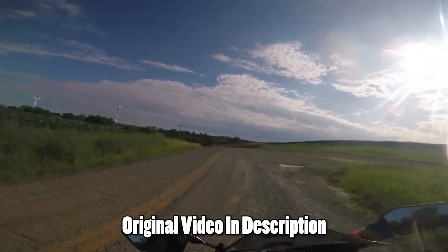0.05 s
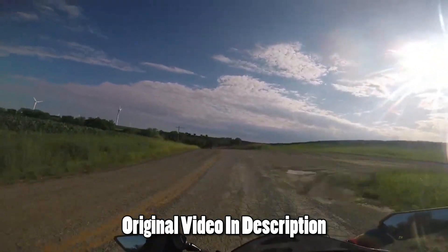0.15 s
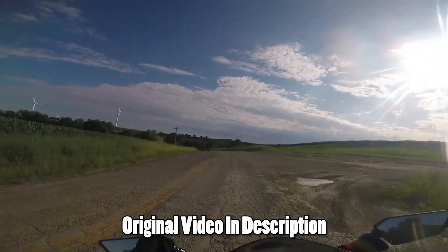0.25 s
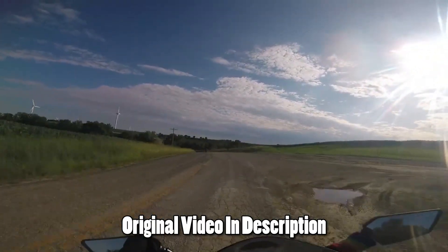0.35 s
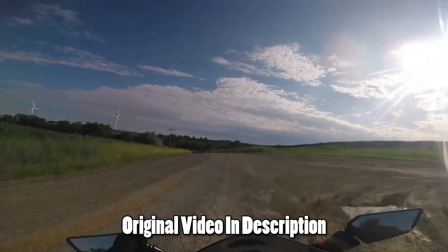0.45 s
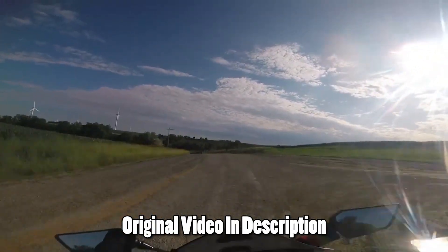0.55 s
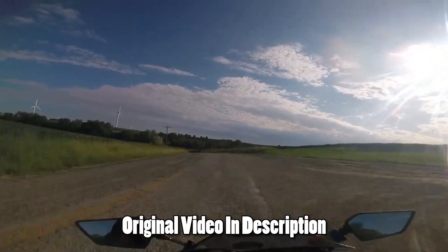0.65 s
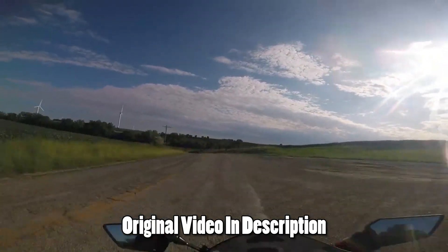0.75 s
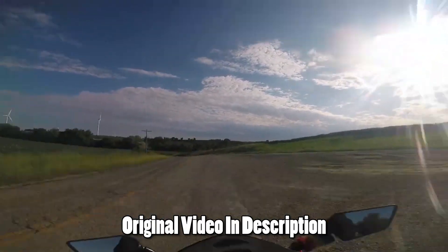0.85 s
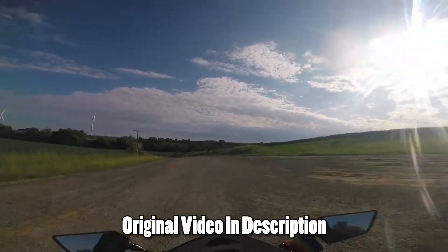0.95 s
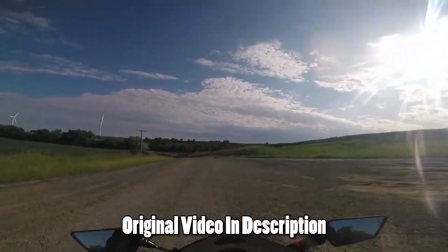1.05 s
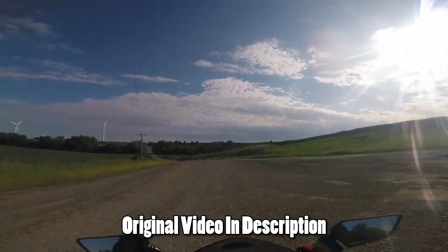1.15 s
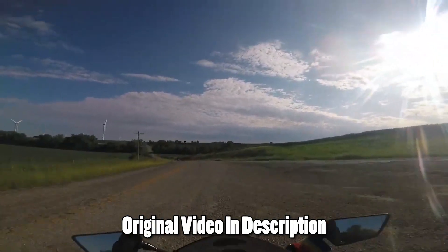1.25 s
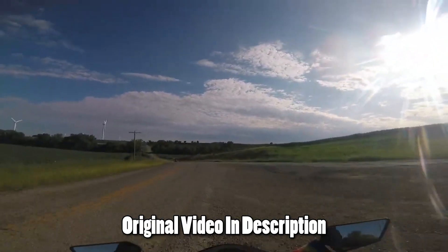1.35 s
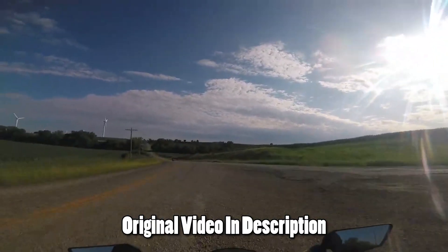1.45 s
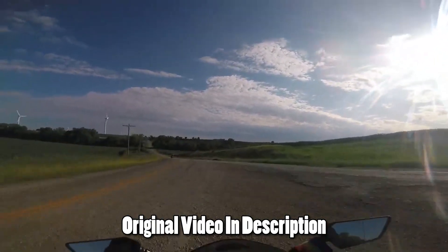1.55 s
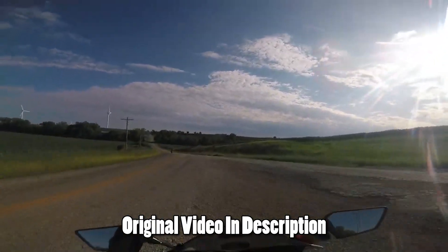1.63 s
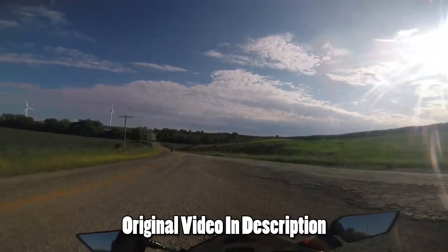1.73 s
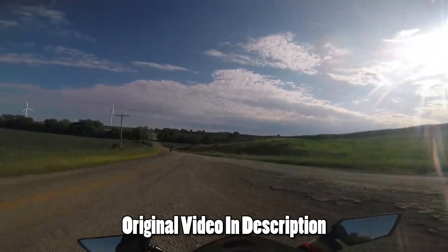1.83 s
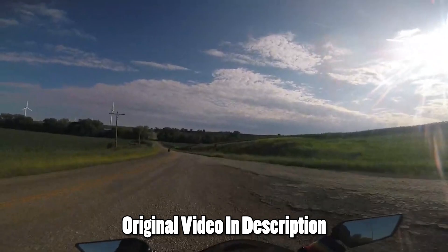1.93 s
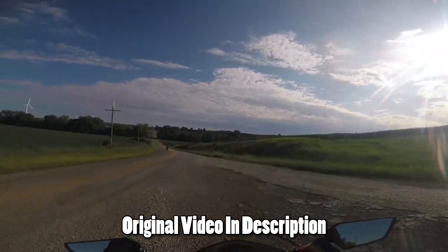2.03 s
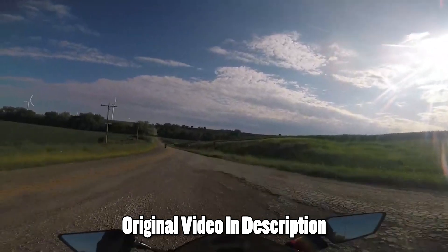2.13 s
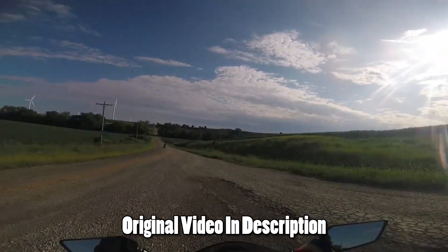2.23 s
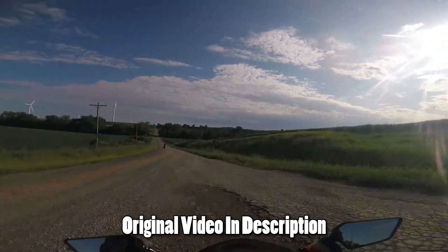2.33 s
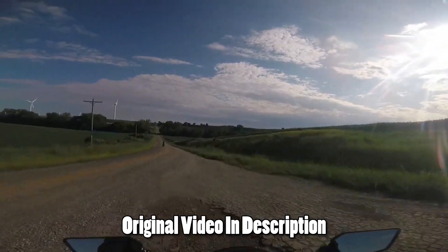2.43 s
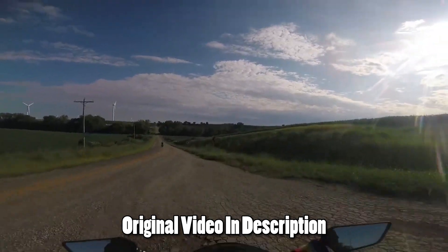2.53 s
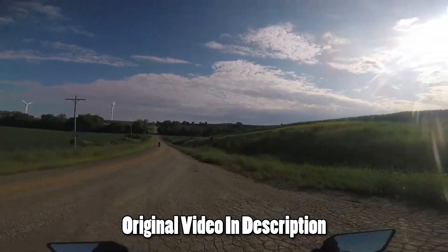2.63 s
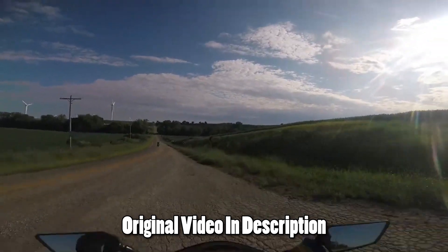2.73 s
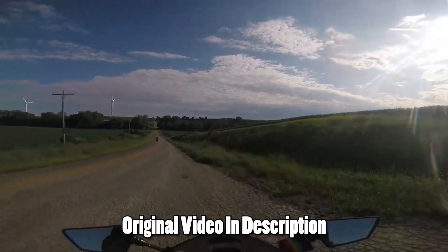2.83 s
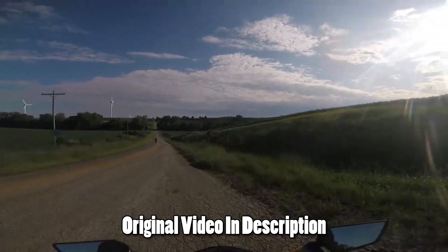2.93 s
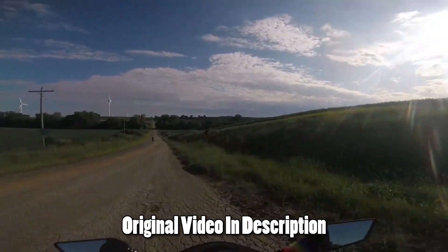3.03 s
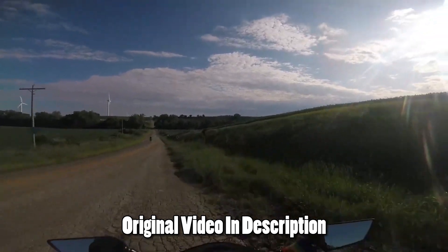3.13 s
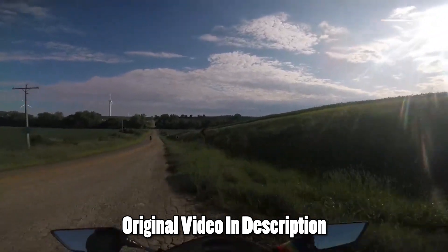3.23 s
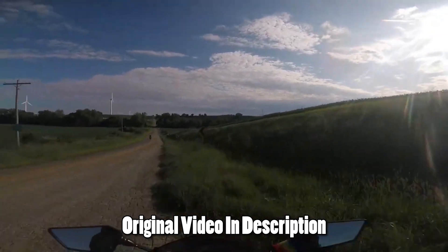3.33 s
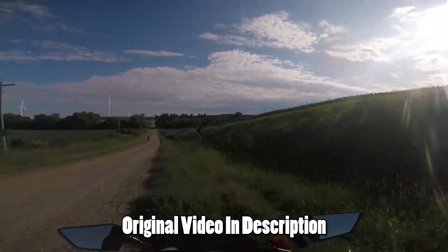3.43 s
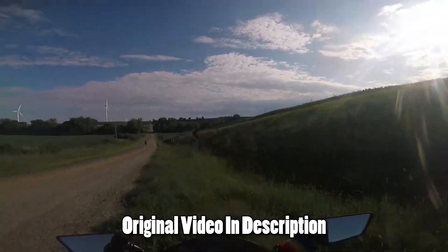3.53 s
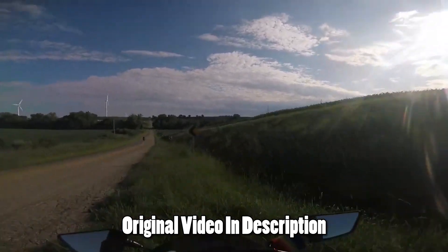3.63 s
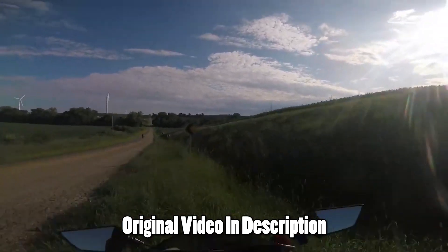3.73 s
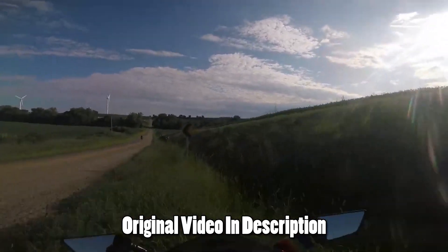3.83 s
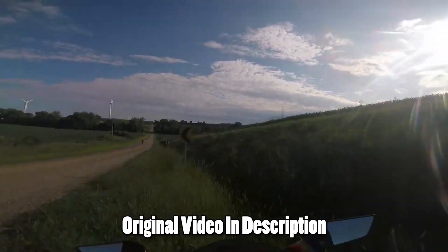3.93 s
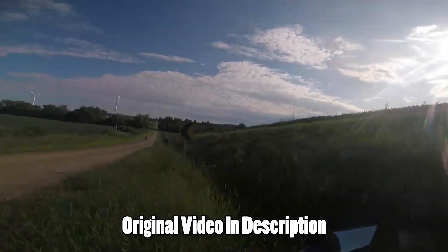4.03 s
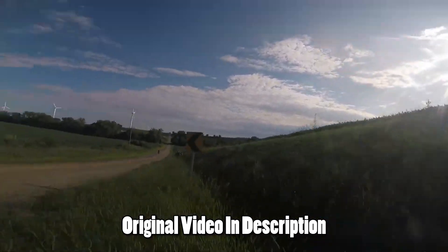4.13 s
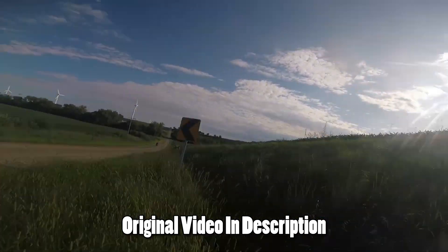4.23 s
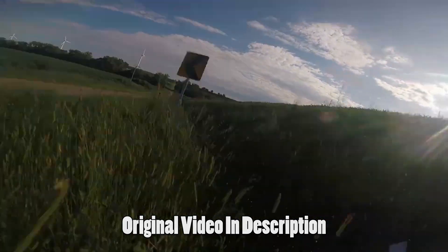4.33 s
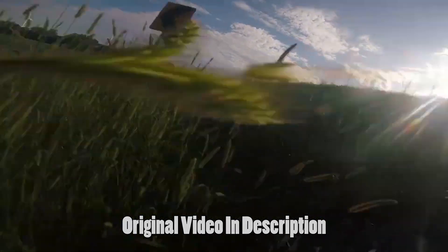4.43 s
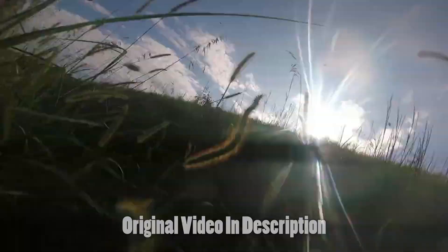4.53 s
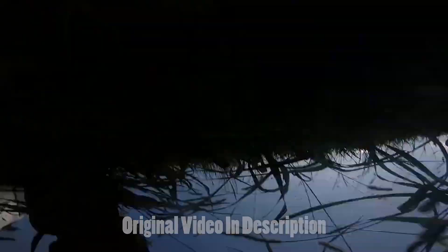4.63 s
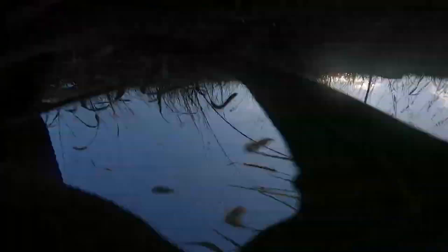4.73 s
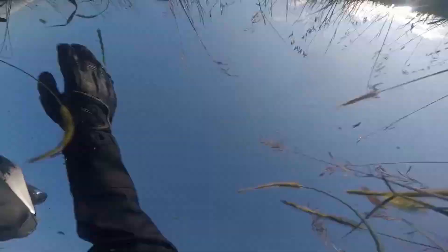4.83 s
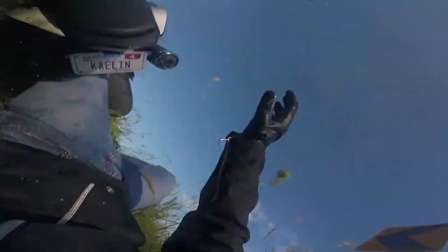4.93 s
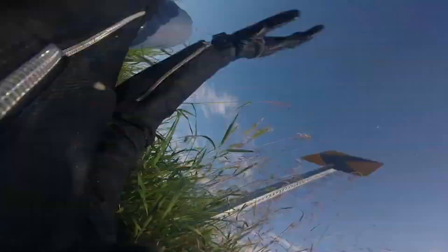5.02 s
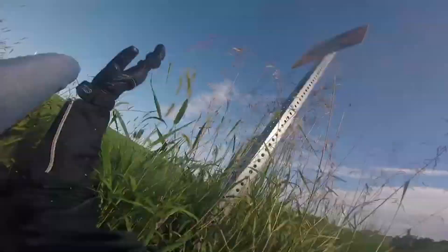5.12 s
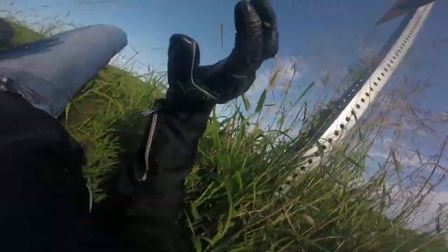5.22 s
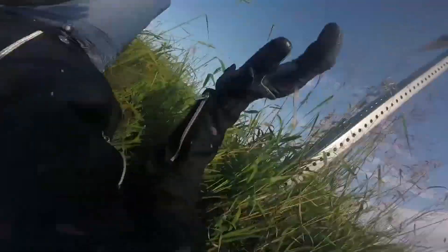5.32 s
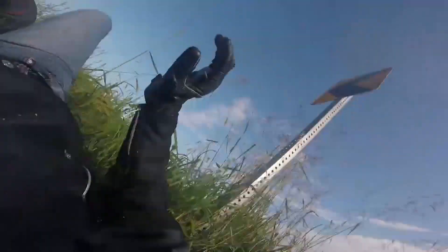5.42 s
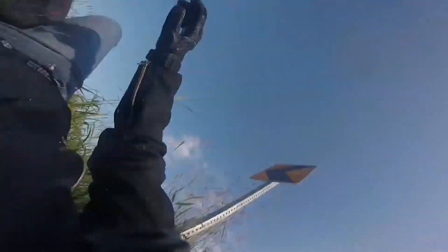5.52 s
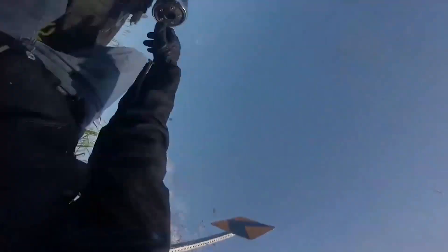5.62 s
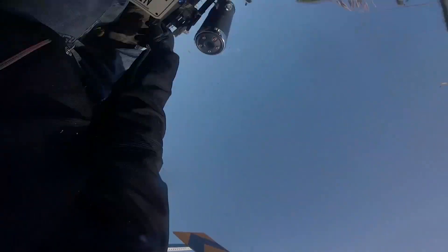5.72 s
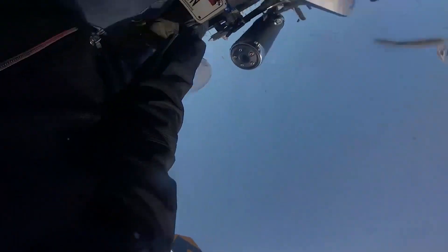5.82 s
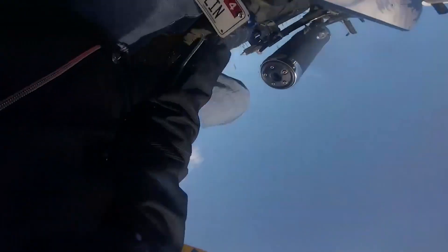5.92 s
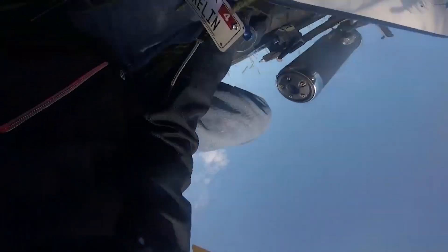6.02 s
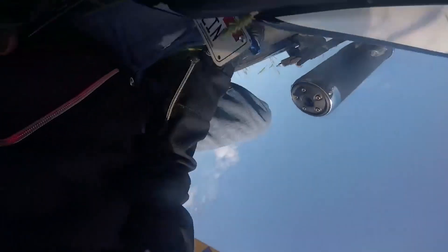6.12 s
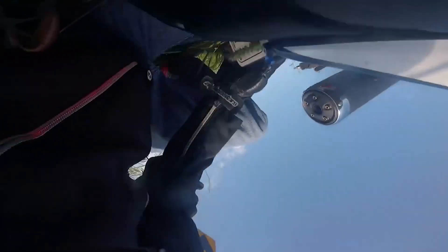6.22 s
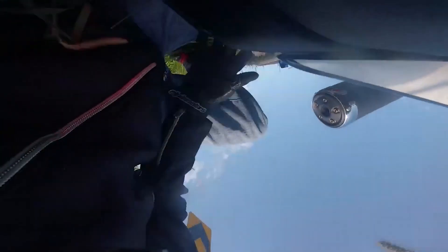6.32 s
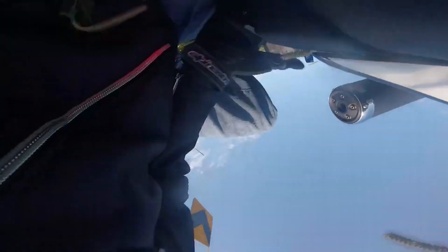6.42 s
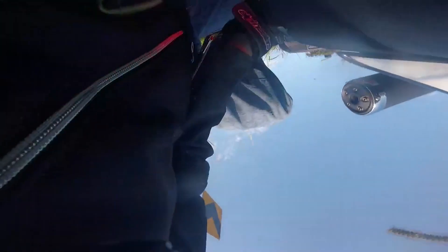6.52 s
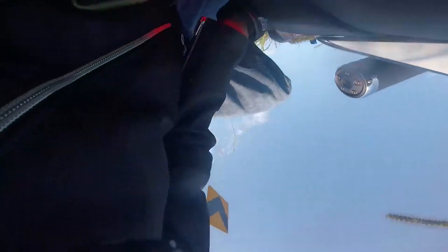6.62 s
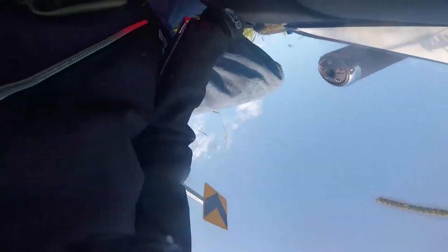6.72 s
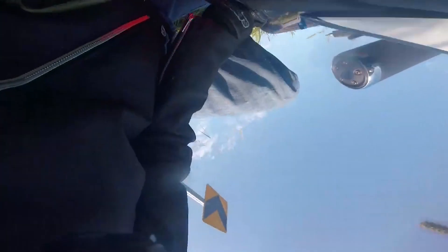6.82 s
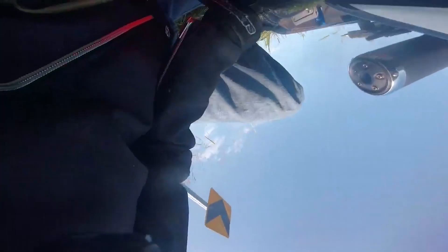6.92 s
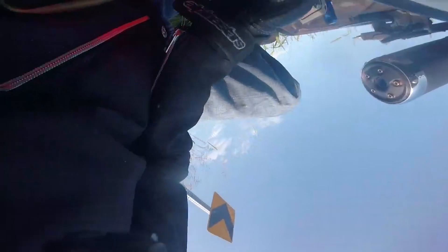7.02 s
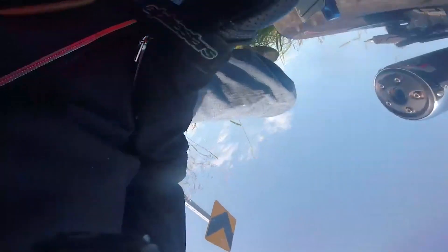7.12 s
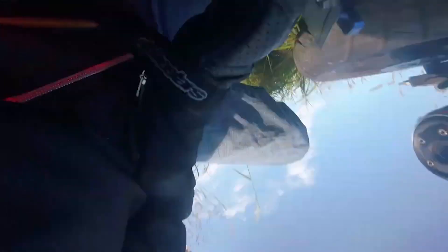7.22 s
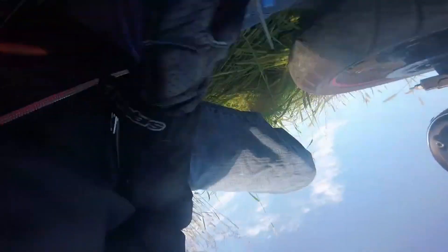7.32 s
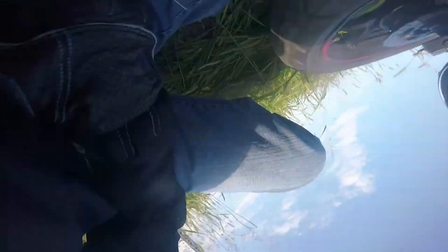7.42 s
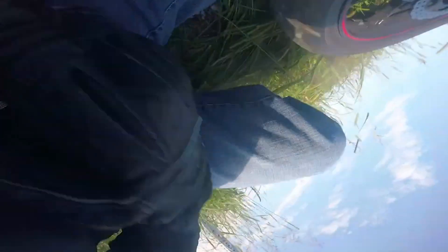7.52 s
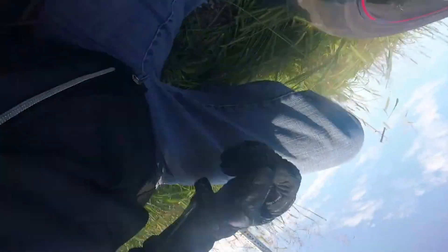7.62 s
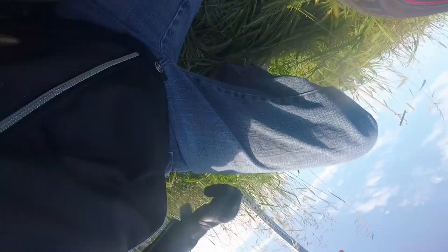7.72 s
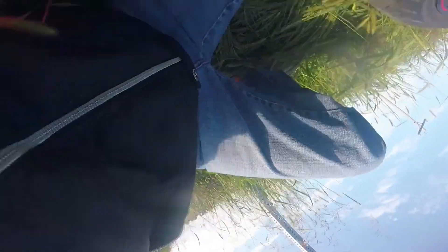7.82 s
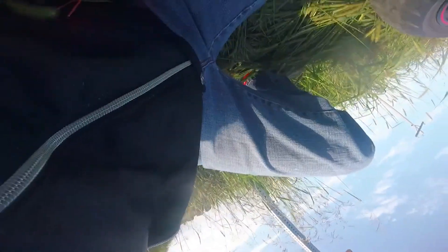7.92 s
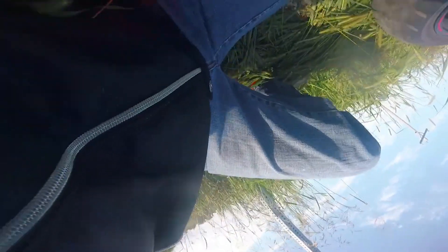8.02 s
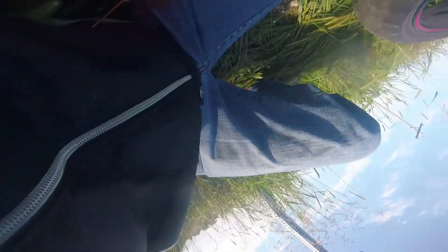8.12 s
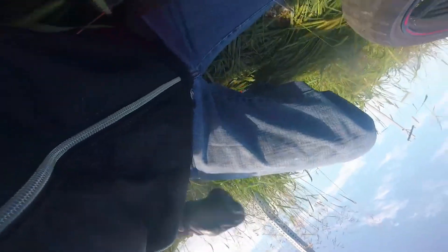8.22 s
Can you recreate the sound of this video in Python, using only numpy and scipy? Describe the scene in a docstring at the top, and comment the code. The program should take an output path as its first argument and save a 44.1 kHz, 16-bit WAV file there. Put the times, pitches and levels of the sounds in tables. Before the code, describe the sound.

Heard from a helmet microphone in a closed case, wind rumbles and rushes as a motorcycle rolls over gravel, with grit ticking and loose parts ringing faintly. The engine drops to idle, then bike and rider tumble into tall grass in a clatter of hollow knocks. The wind stops. The fallen engine chugs softly in spells, cloth and grass rustle, and one more cluster of loud knocks comes near the end.

```python
"""A motorcycle tumble in tall grass

A helmet camera in a closed case rides a slowing motorcycle. Wind shoves the case and rushes past it,
grit and stones tick on it, loose parts ring and the engine drops to idle. Bike and rider tumble into
tall grass in a clatter of knocks that ring the case. Then the fallen engine chugs in spells, cloth and
grass rustle, and a brief high swell leads into a last cluster of knocks."""
import sys
import numpy as np
from scipy import signal
from scipy.fft import rfft, irfft, next_fast_len
from scipy.io import wavfile
from scipy.ndimage import uniform_filter1d

SR = 44100
rng = np.random.default_rng(int(sys.argv[2]) if len(sys.argv) > 2 else 0)


def to_wav(s):
    """Save 16-bit WAV."""
    ch = np.atleast_2d(s).T  # columns
    pcm = np.round(np.clip(ch, -1, 1) * 32767)  # PCM
    wavfile.write(sys.argv[1], SR, pcm.astype(np.int16))


N = 364261
T = np.arange(N) / SR

# Air rush, falling with speed and dipping in lulls. Each row: time in seconds, level in dB.
RUSH_LEVELS = [(0.0, -24.5), (0.5, -23), (0.69, -26.5), (2.08, -28.5), (2.43, -25), (2.5, -31), (2.6, -25),
               (2.88, -36), (2.94, -39), (3.16, -29.5), (3.31, -37.5), (3.44, -33), (3.47, -27.5),
               (3.75, -34), (4.38, -29.5), (4.47, -44), (4.66, -35.5), (4.71, -58), (4.76, -35.5),
               (4.95, -56.5)]
# The pitches at which the case rings. Each row: pitch in Hz, width in Hz, level in dB.
CASE_TONES = [(262.7, 8.8, -6), (413, 120, -4), (810, 19, -6), (1382, 167, 2.5), (2287, 400, -16),
              (3120, 320, -17.5), (3895, 91, -18), (4540, 37, -22.5), (5580, 57, -37.5), (6260, 670, -40)]
# Spells in which the idle is heard. Each row: first and last chug in seconds, chugs per second,
# first and last level in dB.
IDLE_SPELLS = [(2.944, 3.888, 11.7, -27.5, -26.5), (5.189, 5.4, 11.4, -57, -53.5),
               (5.618, 5.926, 9.7, -55.5, -47), (6.032, 6.552, 11.6, -40.5, -38),
               (6.64, 7.096, 10.8, -34.5, -28.5), (7.387, 7.618, 8.9, -39, -37),
               (7.726, 8.141, 9.5, -33.5, -41)]
# The rider lying in the grass. Each row: time in seconds, sway level in dB, rustle level in dB.
LYING_LEVELS = [(4.9, -51, -80), (4.98, -27, -56.5), (5.14, -43, -71.5), (5.35, -52.5, -73.5),
                (5.41, -56, -63), (5.56, -44.5, -70), (5.83, -46.5, -74), (6.38, -38.5, -62.5),
                (6.43, -41, -58), (6.66, -30, -57.5), (6.72, -30.5, -59), (7.13, -28, -49.5),
                (7.35, -25.5, -68.5), (7.5, -46, -67.5), (7.76, -37, -61), (8.26, -37, -62.5)]


def undb(db):
    """Turn decibels into a gain to multiply by."""
    return np.exp(np.asarray(db) * (np.log(10) / 20))


def unit(x):
    """Scale a signal to an average strength (rms) of 1."""
    return x / np.sqrt(np.mean(x ** 2))


def curves(table):
    """Join a table's timed points with straight lines, one curve for each level column."""
    times, *columns = np.transpose(table)
    return [np.interp(T, times, column) for column in columns]


def during(start, end, fade_samples):
    """A switch with soft edges: 1 between two times in seconds, 0 outside."""
    return uniform_filter1d(1. * (T > start) * (T < end), fade_samples)


def add(out, start, piece):
    """Mix a short sound into `out` at `start` seconds."""
    i = int(start * SR)
    out[i:i + len(piece)] += piece[:len(out) - i]


def band(x, hz, width):
    """Let a signal ring at one pitch; a smaller width in Hz rings longer."""
    return signal.lfilter(*signal.iirpeak(hz, hz / width, fs=SR), x)


def noise(lo_hz, hi_hz):
    """Steady noise between two frequencies."""
    passband = signal.butter(2, [lo_hz, hi_hz], "band", fs=SR, output="sos")
    return unit(signal.sosfilt(passband, rng.standard_normal(N)))


def pitched_noise(hz, width):
    """Steady noise gathered around one pitch."""
    return unit(band(rng.standard_normal(N), hz, width))


def wander(rate):
    """A smooth random curve, mostly within -1 to 1, with `rate` new values a second."""
    hold = int(SR / rate)
    steps = np.repeat(rng.standard_normal(N // hold + 1), hold)
    return 1.11 * uniform_filter1d(uniform_filter1d(steps, hold), hold)[:N]


def hiss(outline, tones, gust_db, flicker_db, low_db=0, high_db=0):
    """Shaped noise whose octaves gust together and flicker alone; lows and highs can be lifted."""
    size = next_fast_len(N)
    hz = np.maximum(np.fft.rfftfreq(size, 1 / SR), 1)
    outline_hz, outline_db = np.transpose(outline)
    power = undb(np.interp(np.log(hz), np.log(outline_hz), outline_db)) ** 2
    power += sum(undb(2 * db) / (1 + (2 * (hz - pitch) / width) ** 2) ** 2 for pitch, width, db in tones)
    spectrum = rfft(rng.standard_normal(N), size) * np.sqrt(power)
    out, gust = 0, gust_db * wander(13)
    for octave in range(-3, 5):
        share = np.cos(np.pi / 2 * np.clip(np.log2(hz / 1400) - octave, -1, 1)) ** 2
        level_db = gust + flicker_db * wander(25) + low_db * (octave < 0) + high_db * (octave > 0)
        out = out + irfft(spectrum * share, size)[:N] * undb(level_db)
    return out / np.std(irfft(spectrum, size))


def crackle(rate, spread_db, lo_hz, hi_hz, smear_s):
    """Tiny noisy ticks in flurries, about `rate` a second, each dying away quickly."""
    hits = rng.random(N) < rate * undb(3 * wander(9)) / SR
    ticks = hits * undb(spread_db * np.minimum(rng.exponential(size=N), 2))
    tails = signal.lfilter([1], [1, -np.exp(-1 / (smear_s * SR))], ticks)
    return unit(uniform_filter1d(tails, size=16) * noise(lo_hz, hi_hz))


def rough_tone(hz, t, wobble):
    """A tone made rough by a wobble in its phase."""
    return np.sin(2 * np.pi * hz * t + wobble)


def wind_buffeting():
    """Swirls of air shove the case slowly, making a deep rumble."""
    # It builds, holds, and dies once the rider is down. Each row: time in seconds, level in dB.
    levels = [(0.3, -23), (0.69, -17.5), (4.38, -16), (4.42, -20), (4.66, -28.5), (4.71, -32), (4.95, -58)]
    pressure = unit(noise(4.66, 20) + 0.48 * undb(3.2 * wander(15)) * noise(27, 60))
    pressure = unit(pressure + 0.24 * (pressure ** 2 - 1))  # peaks are sharper than troughs
    pressure = unit(np.tanh(pressure / 2.2))  # the closed case holds back the strongest swirls
    return undb(curves(levels)[0]) * pressure


def bike_drone():
    """The bike drones through the helmet, following the air rush and sinking as it coasts at idle."""
    coasting = during(*IDLE_SPELLS[0][:2], fade_samples=SR // 10)
    level_db = -7.5 + 0.78 * curves(RUSH_LEVELS)[0] - 3 * coasting + 4.3 * wander(20)
    return undb(level_db) * unit(noise(77, 150) + 0.068 * pitched_noise(125, 31))


def air_and_tyres(rush_db):
    """Air rushes past the case while the tyres roar and hiss on gravel."""
    # The rush as heard through the case. Each row: frequency in Hz, level in dB.
    outline = [(150, -23.5), (240, -9.5), (310, -15), (500, -6.5), (620, -11), (950, -13), (1550, -6),
               (1900, -20), (2650, -30), (3600, -25), (4200, -29.5), (5120, -37), (6900, -50), (9000, -55),
               (12500, -67.5), (15000, -79)]
    tumbling = during(4.4, 4.68, fade_samples=SR // 30)
    roar_db = 4 - 1.03 * T + 11 * tumbling  # the lows fade as the bike slows and swell in the tumble
    lull_db = uniform_filter1d(rush_db, SR // 2) - rush_db
    fill_db = 0.6 * lull_db * (T < 4.2)  # tyre hiss partly fills each lull in the treble
    return hiss(outline, CASE_TONES, gust_db=0.68, flicker_db=2, low_db=roar_db, high_db=fill_db)


def grit_and_stones():
    """Flying grit ticks brightly; stones and stems ring the five lowest tones of the case."""
    # Each row: time in seconds, grit level in dB compared with the air rush.
    grit_levels = [(1.1, -40), (1.4, -18), (2.6, -29.5), (3, -18)]
    grit = unit(band(crackle(90, 6.2, 2600, 4600, smear_s=0.0039), 4200, 2500))
    stones = crackle(70, 4, 400, 4500, smear_s=0.005)
    ringing = unit(sum(undb(db) * band(stones, hz, 2 * width) for hz, width, db in CASE_TONES[:5]))
    return undb(curves(grit_levels)[0]) * grit + undb(-10.5) * ringing


def rattling_parts():
    """Loose parts are tapped and ring briefly, each a wavering tone with a soft start."""
    # Each row: pitch in Hz, seconds to fade by 60 dB, a list of taps (start in seconds, level in dB).
    parts = [(778, 0.094, [(.43, -15), (.568, -12), (.597, -11.5), (.622, -12.5)]), (4470, .12, [(.78, -41),
             (.94, -41), (2.735, -44), (2.784, -40), (2.855, -44), (3.22, -44)]), (5375, .11, [(.79, -40),
             (.985, -45), (2.64, -45), (2.775, -40), (2.919, -46)]), (520, .06, [(4.428, -8)]),
             (3900, 0.024, [(4.426, -11)])]
    out, t, wobble = np.zeros(N), T[:SR // 4], 0.8 * wander(200)
    for hz, fade_s, taps in parts:
        envelope = 1000 ** (-t / fade_s) * (1 - np.exp(-t / 0.0019))
        for start, db in taps:
            tone = rough_tone(hz, t, wobble[int(start * SR):][:len(t)])
            add(out, start, undb(db) * tone * envelope)
    return out * undb(1.8 * wander(130))


def jingle():
    """Loose parts keep up a faint, high ringing while they are shaken."""
    # Each row: pitch in Hz, width in Hz, level in dB compared with the air rush.
    parts = [(4470, 30, -27), (5375, 30, -33)]
    # Spells of shaking. Each row: start and end in seconds.
    spells = [(.75, 1.05), (2.55, 3.3), (3.9, 4.15)]
    shaken = sum(during(start, end, fade_samples=SR // 20) for start, end in spells)
    return shaken * sum(undb(db + 4 * wander(8) + 3 * wander(50)) * pitched_noise(hz, width)
                        for hz, width, db in parts)


def contact(t, fade_s):
    """The force of one touch: it rises fast, then falls by 60 dB in fade_s seconds."""
    t = np.maximum(t, 0)
    return 1000 ** (-t / fade_s) * (1 - np.exp(-t / 0.00092))


def case_knocks():
    """Each blow is a short, bouncing scrape that rings the case, with a crack and a dull thud."""
    # Each row: start in seconds, ring level in dB, brightest pitch in Hz,
    # crack level in dB compared with the ring.
    blows = [(1.606, -16.5, 1370, -13), (2.537, -10, 1530, -29), (2.826, -15.5, 1280, -42),
             (3.178, -25, 1410, -18), (3.459, -19, 544, -16), (3.666, -20, 1340, -24),
             (3.899, -14, 1290, -23), (4.072, -18, 1400, -15), (4.211, -19.5, 1350, -20),
             (4.401, -2, 1600, -11), (4.425, -21, 2320, -3), (4.453, -6, 1490, 3), (4.473, -21, 1570, -27),
             (4.524, -13.5, 1430, -29), (4.529, -6.5, 3084, -41), (4.551, -8.5, 1620, -25),
             (4.591, -14, 1450, -13), (4.601, -13, 404, -2.5), (4.613, -8, 1180, -25),
             (4.617, -5.5, 1390, -11), (4.646, -13.5, 690, -24.5), (4.658, -17, 1440, -26),
             (4.699, -31.5, 548, -11), (4.732, -30.5, 543, 4), (4.749, -22.5, 1520, -11),
             (4.779, -18, 1440, -8.5), (4.983, -23, 460, -32), (5.017, -32.5, 534, -45),
             (5.104, -42.5, 503, -39), (5.159, -43.5, 1940, 2.5), (5.365, -46.5, 2134, -12),
             (5.384, -47, 1500, 0), (5.404, -38.5, 650, -3), (5.454, -34.5, 1910, -6.5),
             (5.617, -38.5, 1730, -2.5), (5.928, -47, 649, -1), (6.137, -48.5, 495, -30.5),
             (6.239, -46, 956, -36.5), (6.501, -39, 1000, -30.5), (6.607, -37.5, 606, -23),
             (7.159, -4.5, 534, 1.5), (7.179, -11.5, 1580, -32), (7.19, -7.5, 1550, -20.5),
             (7.192, -11, 503, -13), (7.208, -44, 1570, -25), (7.228, -19.5, 1390, -39),
             (7.281, -26.5, 1360, -33), (7.321, -42, 494, -46), (7.643, -39.5, 490, -32)]
    out, t = np.zeros(N), T[:SR // 12]
    crack_filter = signal.butter(3, [1900, 4800], "band", fs=SR)
    thud = np.sin(2 * np.pi * 50 * t ** 0.746) * np.exp(-t / 0.014)  # pitch sags as the contact softens
    scrapes = rng.standard_normal((len(blows), len(t)))
    bounce_gaps_s = 0.0085 * (0.5 + rng.random((len(blows), 2)))  # each blow bounces twice
    for (start, db, hz, crack_db), scrape, gaps in zip(blows, scrapes, bounce_gaps_s):
        fade_s = 0.018 * (hz / 1000) ** -0.3  # duller blows last longer
        bounces = sum(undb(-12.5 * (k + 2.5)) * contact(t - delay, fade_s)
                      for k, delay in enumerate(np.cumsum(gaps)))
        drag = undb(-36.5) * np.exp(-t / 0.029)
        burst = scrape * (contact(t, fade_s) + drag + bounces)
        # Case tones near the blow's brightest pitch are favoured.
        ring = sum(undb(0.39 * tone_db - 4.5 * abs(np.log2(pitch / hz)))
                   * band(burst, pitch, 0.78 * width) for pitch, width, tone_db in CASE_TONES)
        ring += 2.4 * band(band(burst, hz, 0.48 * hz), hz, 0.48 * hz)
        ring = signal.lfilter(*signal.butter(2, min(4 * hz, 6000), fs=SR), ring)
        crack = signal.lfilter(*crack_filter, burst * np.exp(-t / 0.0021))
        # Bright or cracking blows thud less.
        thud_db = 3.5 - 6 * np.log2(hz / 500) - 0.3 * max(crack_db + 28.5, -9)
        knock = ring / np.abs(ring).max() + undb(crack_db) * crack / np.abs(crack).max()
        add(out, start, undb(db) * (knock + undb(thud_db) * thud))
    return signal.sosfilt(signal.butter(2, 6000, fs=SR, output="sos"), out)


def engine_idle():
    """Two cylinders fire unevenly in each chug, and their puffs ring the exhaust."""
    # The exhaust's tones. Each row: pitch in Hz, width in Hz, level in dB.
    exhaust_tones = [(94.5, 47.5, 8), (168, 20, -13)]
    pressure, puff = np.zeros(N), np.hanning(SR // 170)
    for first, last, rate, first_db, last_db in IDLE_SPELLS:
        count = round((last - first) * rate) + 1
        time_jitter, level_jitter, second_lags, second_sizes = rng.standard_normal((count, 4)).T
        times = np.linspace(first, last, count) + 0.003 * time_jitter
        levels = np.linspace(first_db, last_db, count) + 3 * level_jitter
        for start, db, lag, size in zip(times, levels, second_lags, second_sizes):
            add(pressure, start + 0.0036, -undb(db) * puff)
            add(pressure, start + 0.023 + 0.0018 * lag, -undb(db - 1 + 1.7 * size) * puff)
    return 0.059 * pressure + sum(undb(db) * band(pressure, hz, width) for hz, width, db in exhaust_tones)


def grass_scratches():
    """Stems and cloth scrape the case in dense ticks, many near one of its high tones."""
    # Each row: start and end in seconds, first and last level in dB.
    strokes = [(4.21, 4.395, -74, -32.5), (4.42, 4.65, -61, -69), (4.733, 4.908, -40.5, -61),
               (7.248, 7.278, -73, -43)]
    envelope, fade_s = np.zeros(N), 0.0097
    for start, end, first_db, last_db in strokes:
        edges = np.clip(np.minimum(T - start, end - T) / fade_s + 1, 0, 1)
        envelope += edges * undb(np.interp(T, [start, end], [first_db, last_db]))
    bright = crackle(230, 3.2, 3400, 4100, smear_s=0.0036)
    broad = crackle(220, 3.4, 700, 3400, smear_s=0.0078)
    return envelope * (bright + 0.92 * broad)


def helmet_shoves():
    """The helmet bumps the ground: pressure rises, swings back and soon dies."""
    # Each row: start in seconds, level in dB, pitch in Hz.
    bumps = [(4.387, -18, 30), (4.428, -9, 33), (4.452, -6, 48), (4.508, -11.5, 16), (4.527, -12, 53),
             (4.588, -27, 23), (4.617, -4.5, 56), (4.643, -12, 35), (4.988, -15, 58), (5.528, -32, 73),
             (7.161, -12, 43), (7.18, -14, 66), (7.206, -16, 61), (7.319, -15.5, 25)]
    out, t = np.zeros(N), T[:SR // 5]
    for start, db, hz in bumps:
        envelope = np.exp(-t * hz) * (1 - np.exp(-t / 0.00084))
        add(out, start, undb(db) * envelope * np.sin(2 * np.pi * hz * t))
    return out


def scuffs():
    """Ground, grass and cloth give grainy rubs that start quickly and trail off."""
    # Each row: start in seconds, fade time in seconds, level in dB, treble limit in Hz.
    rubs = [(4.406, 0.04, -43, 4000), (4.456, 0.029, -39, 5000), (4.553, 0.017, -23.5, 4540),
            (4.585, 0.041, -24.5, 2960), (4.642, 0.016, -34, 2470), (5.399, 0.025, -54, 4500),
            (5.449, 0.025, -56, 4560), (5.509, 0.053, -47.5, 1800), (5.925, 0.019, -49.5, 4080),
            (6.4, 0.047, -53.5, 3020), (7.163, 0.048, -30, 1970), (7.225, 0.034, -37, 1780)]
    out, t = np.zeros(N), T[:SR // 4]
    grain = crackle(850, 2.2, 220, 8200, smear_s=0.0025)
    for start, fade_s, db, top_hz in rubs:
        envelope = (1 - np.exp(-t / 0.0024)) * np.exp(-(t / fade_s) ** 2)
        rub = grain[int(start * SR):][:len(t)] * envelope
        add(out, start, undb(db) * signal.sosfilt(signal.butter(4, top_hz, fs=SR, output="sos"), rub))
    return out


def rustle(level_db):
    """Cloth and grass rub together in a gusty hiss with small crackles."""
    # The colour of the rubbing. Each row: frequency in Hz, level in dB.
    outline = [(150, -2), (290, -7.5), (605, -5.5), (779, -18), (942, -9), (1470, -8.5), (1940, -21),
               (2370, -11), (2800, -20), (5120, -35.5), (7000, -35), (15000, -53.5)]
    rubbing = hiss(outline, [(5600, 290, -27.5)], gust_db=1.5, flicker_db=2)
    ticks = unit(band(crackle(20, 2.8, 560, 2180, smear_s=0.007), 1300, 1800))
    return undb(level_db) * (rubbing + undb(-5.5) * ticks)


def ground_hum(rustle_db):
    """The idle hums through the ground, and comes through better while the rider shifts."""
    return undb(-37 + 0.25 * rustle_db + 2 * wander(19)) * noise(51, 109)


def head_sway():
    """The rider's head sways, making very slow swings of pressure."""
    sway_db = curves(LYING_LEVELS)[0]
    return undb(sway_db) * unit(uniform_filter1d(noise(5.96, 24.8), SR // 60))


def faint_hiss():
    """A very quiet, steady hiss in the treble."""
    return undb(-91.5) * (noise(2500, 7200) + 0.54 * pitched_noise(5700, 400))


def swell_before_knock():
    """Three rough, high tones pulse and swell briefly, then stop at the loud knock."""
    # Each row: pitch in Hz, level in dB at the end of the swell.
    tones = [(2200, -16), (2800, -22), (4400, -28)]
    start, end, pulse_hz = 7.125, 7.159, 105
    swell = undb(np.interp(T, [start, end], [-22, 0])) * np.clip((T - start) / 0.016, 0, 1) * (T < end)
    pulses = 0.65 + 0.35 * np.cos(2 * np.pi * pulse_hz * (T - end + 0.003))
    chord = sum(undb(db + 2.5 * wander(250)) * rough_tone(hz, T, 0.9 * wander(500)) for hz, db in tones)
    return swell * pulses * chord


def scene():
    """All sounds meet at one microphone; riding gives way to lying in the grass near 4.9 seconds."""
    rush_db, rustle_db = curves(RUSH_LEVELS)[0], curves(LYING_LEVELS)[1]
    riding = wind_buffeting() + bike_drone()
    riding += undb(rush_db) * (air_and_tyres(rush_db) + grit_and_stones() + jingle())
    mix = riding * np.interp(T, [4.9, 4.96], [1, 0]) + grass_scratches()
    lying = rustle(rustle_db) + ground_hum(rustle_db) + head_sway() + faint_hiss()
    mix += lying * np.interp(T, [4.88, 4.94], [0, 1])
    mix += case_knocks() + helmet_shoves() + scuffs() + engine_idle()
    mix += rattling_parts() + swell_before_knock()
    return mix[None]


def record(dry):
    """The small microphone gently squashes loud peaks, and the highest treble is cut."""
    ceiling, top_hz = 0.6, 15100
    squashed = dry / (1 + np.abs(dry / ceiling) ** 4) ** 0.25
    return signal.sosfilt(signal.ellip(8, 0.2, 70, top_hz, fs=SR, output="sos"), squashed)


dry = scene()
out = record(dry)
to_wav(out)
```